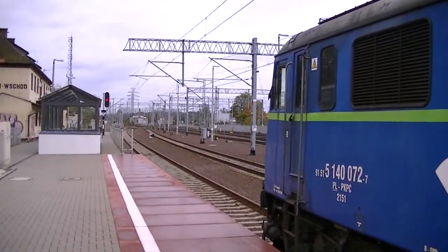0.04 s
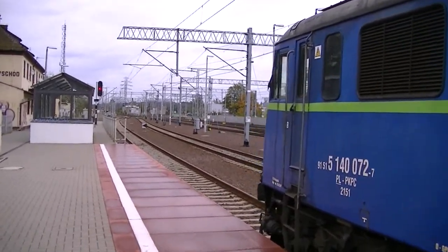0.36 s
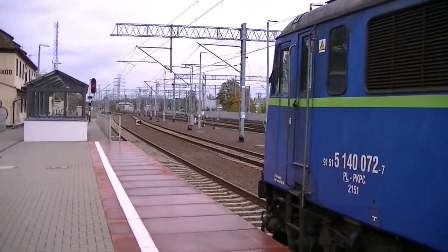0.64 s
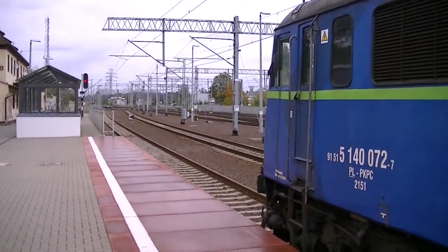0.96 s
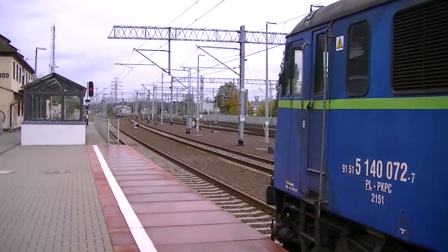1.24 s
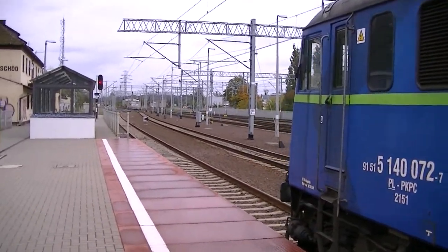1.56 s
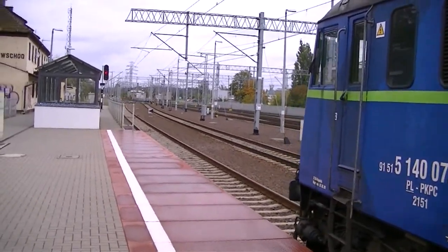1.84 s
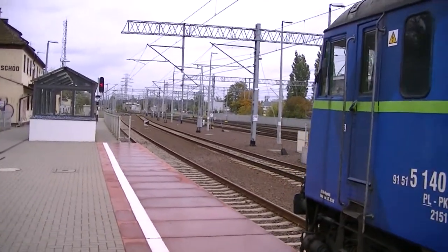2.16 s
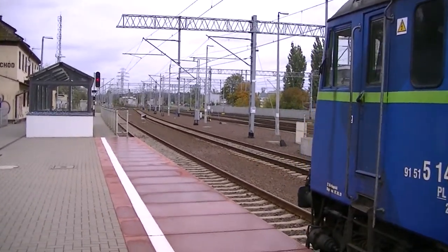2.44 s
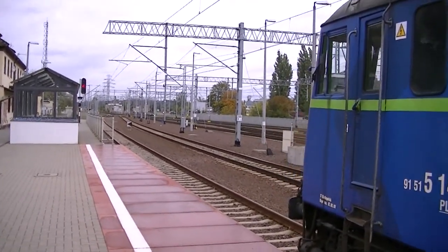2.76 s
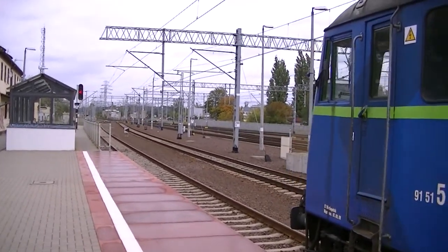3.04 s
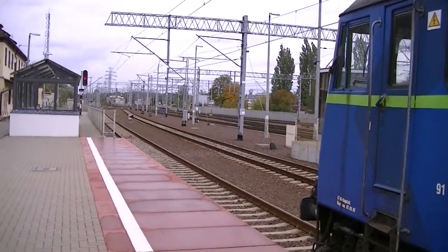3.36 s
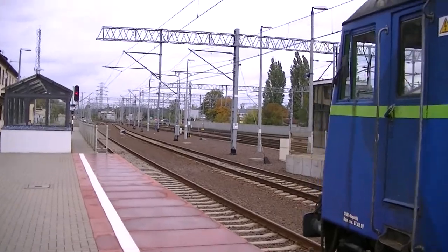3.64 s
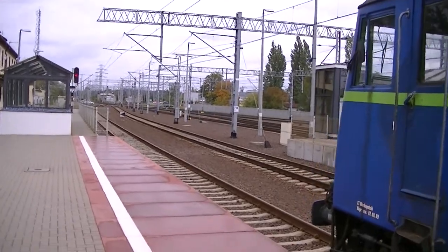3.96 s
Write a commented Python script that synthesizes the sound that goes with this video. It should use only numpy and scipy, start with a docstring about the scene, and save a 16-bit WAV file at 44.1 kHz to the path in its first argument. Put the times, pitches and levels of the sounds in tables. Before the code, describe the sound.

An electric locomotive's cooling blowers rush steadily, close by, for the whole four seconds. Faint breathy whistles swell and glide in the first second, returning near 2.6 and 3.8 seconds. Wind softly thumps the microphone around 0.9 seconds, then buffets it in a stronger cluster from about 2.4 to 3.1 seconds, the rush dipping briefly under the strongest gusts before carrying on evenly.

```python
"""Electric locomotive on a gusty platform

An electric locomotive creeps along the platform, close by, its cooling blowers giving a steady rush
of air. A few faint, breathy whistles rise out of the rush. Gusts of wind buffet the two microphone
ports with soft thumps, and the recorder's gain control ducks the rush under the strongest of them."""
import sys
import numpy as np
from scipy import signal
from scipy.fft import rfft, irfft
from scipy.io import wavfile
from scipy.ndimage import uniform_filter1d

SR = 44100
rng = np.random.default_rng(int(sys.argv[2]) if len(sys.argv) > 2 else 0)


def put_to_file(sound):
    """Save the sound as 16-bit audio at rate SR, in the file named by the first command-line argument."""
    columns = np.atleast_2d(sound).T  # one column per channel
    safe = np.clip(columns, -1, 1)
    whole_steps = np.round(safe * 32767)
    wavfile.write(sys.argv[1], SR, whole_steps.astype(np.int16))


N = 176400
TIME = np.arange(N) / SR


def amp(db):
    """Decibels to gain."""
    return 10 ** (np.asarray(db) / 20)


def unit(x):
    """Scales to rms 1."""
    return x / np.sqrt(np.mean(x ** 2) + 1e-20)


def read(points, hz):
    """Reads a spectrum table on a log-frequency axis."""
    f, value = np.transpose(points)
    return np.interp(np.log(hz + 1), np.log(f + 1), value)


def noise(shape):
    """Noise of rms 1, its spectrum shaped by the gain shape(hz)."""
    return unit(irfft(rfft(rng.standard_normal(N)) * shape(np.fft.rfftfreq(N, 1 / SR)), N))


def swell(centre_s, length_s):
    """A smooth rise and fall."""
    return np.cos(np.pi * np.clip((TIME - centre_s) / length_s, -.5, .5))


# Blower air, close by on the platform: frequency_hz, relative_db
RUSH_SPECTRUM = [(30, -44), (60, -45), (100, -45), (150, -30.5), (200, -26.5), (300, -14), (400, -9),
                 (600, -3), (800, -2), (1080, 0), (1400, -1.43), (2300, -2), (3100, -4.5), (4400, -10),
                 (5200, -14), (8300, -24), (10000, -31.5), (12500, -43), (16000, -70)]
# The rush at the microphone as the locomotive creeps on: time_s, level_db
RUSH_LEVEL = [(0, -39), (.7, -39.0), (1.5, -39.5), (2.3, -39.5), (3.1, -39.7), (4, -40)]
# How alike the rush is at the two ports: frequency_hz, correlation
RUSH_LIKENESS = [(60, .1), (130, 0.4), (270, 1), (580, 0.99), (1250, .98), (2670, 0.94), (5700, 0.93),
                 (12000, 0.92)]
# Its balance across the microphone: frequency_hz, left_minus_right_db
RUSH_BALANCE = [(300, 0), (1000, -0.4), (2000, .5), (4000, 0.9), (10000, .2)]


def blowers(patch_db=0.32, flutter_db=0.34):
    """Cooling blowers push out a broad rush of air with slight turbulent patches."""
    hz = np.fft.rfftfreq(1024, 1 / SR)
    draws = rng.standard_normal((5, N // 256 + 5, len(hz)))
    mid_re, mid_im, side_re, side_im, patches = draws.transpose(0, 2, 1)  # each frequency by time
    patches = uniform_filter1d(patches, size=12, axis=0)
    patches = unit(uniform_filter1d(patches, size=16, axis=1))
    flutter = unit(uniform_filter1d(rng.standard_normal(patches.shape[1]), size=14))
    likeness = np.clip(read(RUSH_LIKENESS, hz), 0, 1)[:, None]
    lean_db = read(RUSH_BALANCE, hz)[:, None] / 2
    mid = np.sqrt(1 + likeness) * (mid_re + 1j * mid_im)
    side = np.sqrt(1 - likeness) * (side_re + 1j * side_im)
    spectra = np.array([(mid + side) * amp(lean_db), (mid - side) * amp(-lean_db)])
    spectra *= amp(read(RUSH_SPECTRUM, hz)[:, None] + patch_db * patches + flutter_db * flutter)
    rush = signal.istft(spectra, nperseg=1024, noverlap=768)[1][:, :N]
    return unit(rush) * amp(np.interp(TIME, *np.transpose(RUSH_LEVEL)))


# Faint whistles in the rush, dead centre: centre_s, length_s, start_hz, end_hz, level_db
WHISTLES = [(0.358, 0.98, 1160, 1194, -50.5), (0.549, .6, 1161, 1028, -50), (.83, 0.27, 1031, 985, -44.5),
            (2.567, 0.37, 1200, 1192, -46), (0.151, 0.28, 2100, 2800, -53), (3.77, 0.15, 2320, 2320, -48.5)]


def whistles(width_hz=36):
    """Narrow, breathy resonances swell, glide and fade."""
    out = np.zeros(N)
    for centre, length, start_hz, end_hz, db in WHISTLES:
        hz = np.interp(TIME, [centre - length / 2, centre + length / 2], [start_hz, end_hz])
        phase = 2 * np.pi * np.cumsum(hz) / SR
        breath = [noise(lambda f: 1 / (1 + (f / width_hz) ** 2)) for _ in range(2)]
        tone = breath[0] * np.cos(phase) + breath[1] * np.sin(phase)
        out += amp(db) * swell(centre, length) * tone
    return out


# Eddies right on the microphone, before the low cut: time_s, pitch_hz, left_db, right_db
THUMPS = [(0.9, 312, -48, -31.5), (.967, 332, -53, -36), (2.4364, 330, -46, -31.5), (2.671, 370, -39, -24),
          (2.7133, 480, -26, -19), (2.7987, 357, -31, -38), (2.8068, 445, -39, -23),
          (3.0199, 384, -29, -42)]


def thumps(width_cycles=0.51, sag_per_s=61):
    """Each eddy pushes and pulls on a port for a cycle or two, dropping in pitch."""
    out = np.zeros((2, N))
    for time_s, hz, left_db, right_db in THUMPS:
        t = np.clip(TIME - time_s, -.02, .1)
        turns = hz * (1 - np.exp(-sag_per_s * t)) / sag_per_s
        envelope = np.exp(-.5 * (t * hz / width_cycles) ** 2)
        push = envelope * np.sin(2 * np.pi * (turns + rng.random((2, 1)) / 4))
        out += amp([[left_db], [right_db]]) * push
    return out


# Gusts across the microphone, before the low cut: centre_s, length_s, left_db, right_db
GUSTS = [(0.411, 0.054, -52, -48), (0.788, 0.048, -58, -49), (0.861, .07, -39, -40),
         (0.942, 0.17, -58, -51.5), (1.716, .045, -56, -52), (1.94, 0.057, -52, -52),
         (2.455, 0.14, -62, -52.5), (2.614, 0.052, -43.5, -42.5), (2.701, 0.21, -44, -42),
         (2.814, 0.12, -42, -45), (2.88, 0.037, -50, -48), (3.036, 0.1, -47, -50.5)]
# Turbulence at one port: frequency_hz, relative_db
BUFFET_SPECTRUM = [(30, -24), (70, -22), (110, -9.5), (160, -3.5), (270, 1), (420, -1), (650, -10),
                   (1000, -14.5), (2000, -29), (5000, -65)]


def wind(breeze_db=-78.5, swing_db=5):
    """A light, uneven breeze and short gusts stir low turbulence, unrelated at the two ports."""
    ports = []
    for port in range(2):
        drift = noise(lambda f: np.exp(-(f / 10) ** 2))
        force = amp(breeze_db + swing_db * drift)
        for centre, length, *db in GUSTS:
            force += amp(db[port]) * swell(centre, length) ** 2
        ports.append(force * noise(lambda f: amp(read(BUFFET_SPECTRUM, f))))
    return np.array(ports)


def scene():
    """The locomotive close by, and wind on the microphone with its deepest bass cut away."""
    low_cut = signal.butter(2, 112, "high", fs=SR, output="sos")
    return blowers() + whistles() + signal.sosfiltfilt(low_cut, wind() + thumps())


def record(dry, sense_hz=418, threshold_db=-47, squeeze=0.28, attack_s=0.0038, recover_db_per_s=294):
    """Gain control ducks everything just after wind loads the bass; the top treble is then cut."""
    bass = signal.sosfilt(signal.butter(2, sense_hz, fs=SR, output="sos"), dry)
    power = abs(uniform_filter1d((bass ** 2).mean(0), size=180))
    bass_db = 10 * np.log10(power + 1e-12)
    fall_db = TIME * recover_db_per_s
    held_db = np.maximum.accumulate(bass_db + fall_db) - fall_db  # each peak falls away steadily
    lag = np.exp(-1 / (attack_s * SR))
    over_db = signal.lfilter([1 - lag], [1, -lag], np.maximum(held_db - threshold_db, 0))
    ducked = dry * amp(-squeeze * over_db)
    low_pass = signal.firwin(511, cutoff=12850, window=("kaiser", 8), fs=SR)
    return signal.oaconvolve(ducked, low_pass[None], "same", axes=1)


dry = scene()
out = record(dry)
put_to_file(out)
```